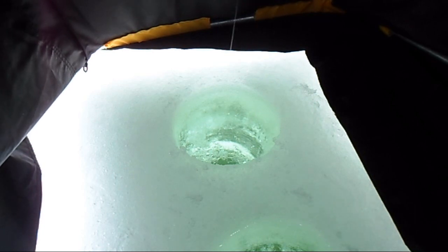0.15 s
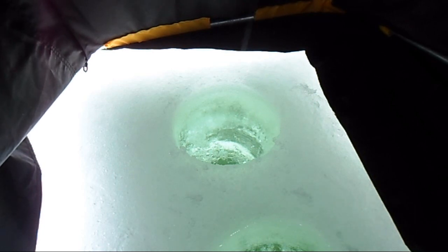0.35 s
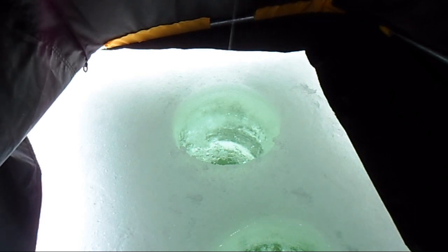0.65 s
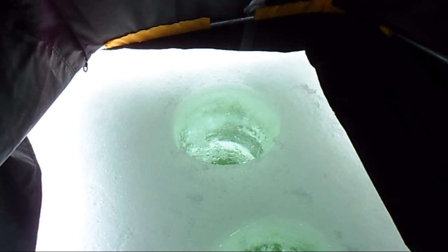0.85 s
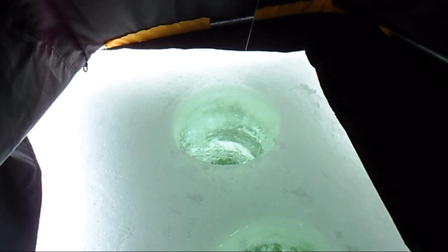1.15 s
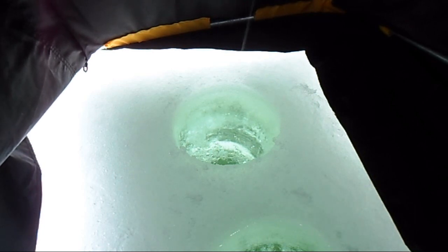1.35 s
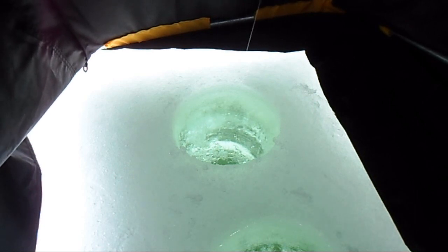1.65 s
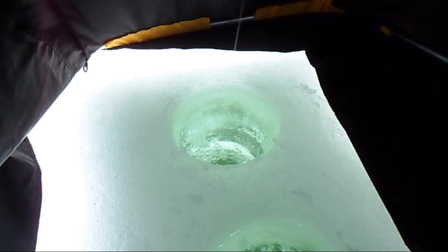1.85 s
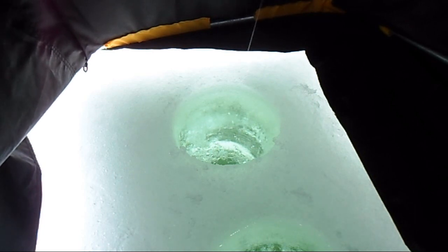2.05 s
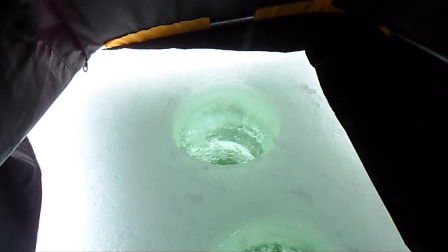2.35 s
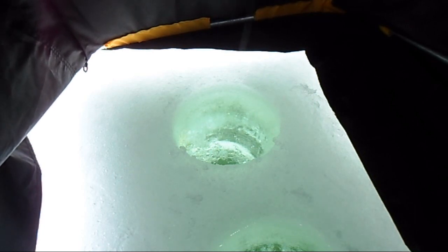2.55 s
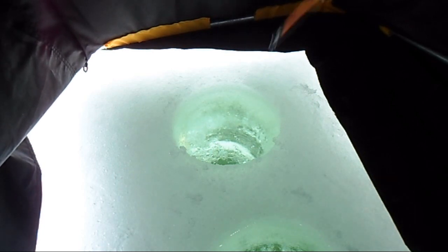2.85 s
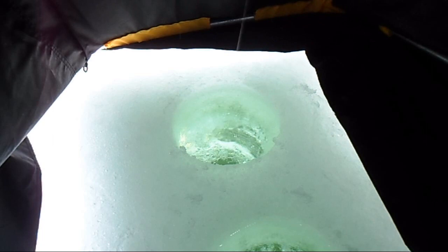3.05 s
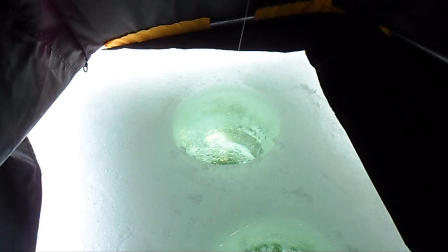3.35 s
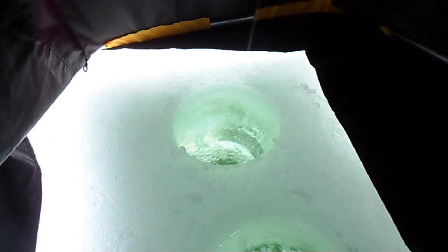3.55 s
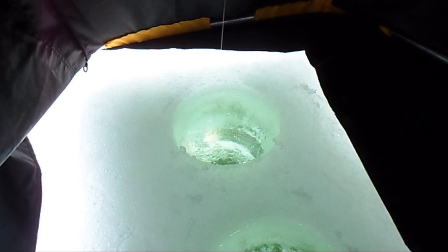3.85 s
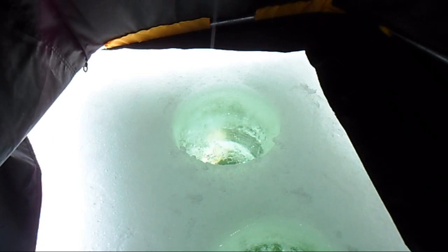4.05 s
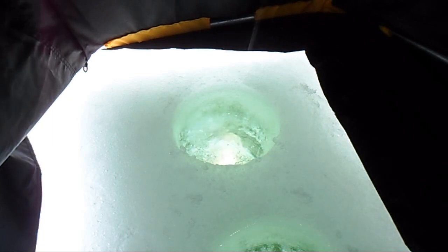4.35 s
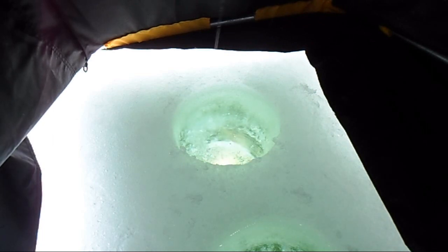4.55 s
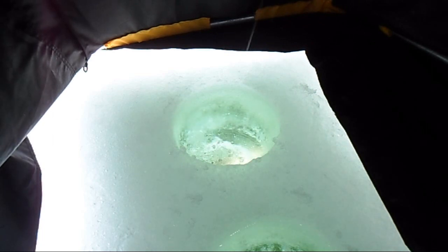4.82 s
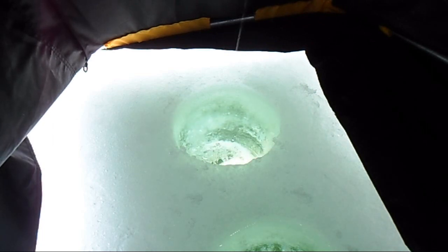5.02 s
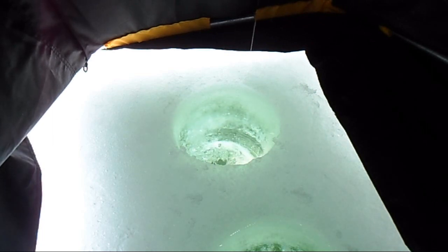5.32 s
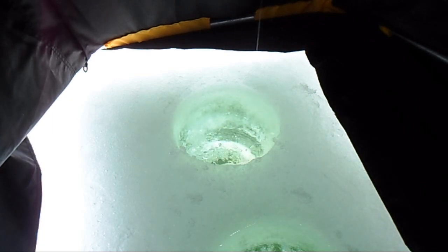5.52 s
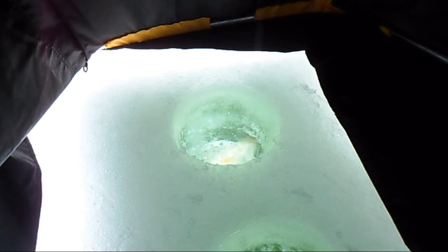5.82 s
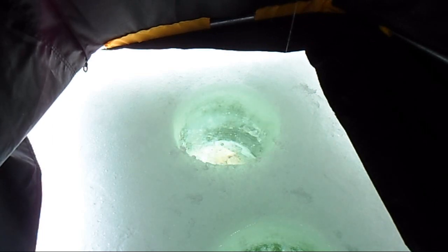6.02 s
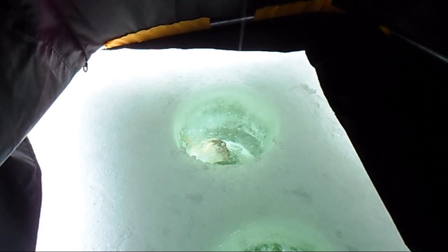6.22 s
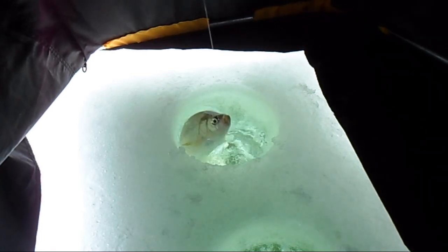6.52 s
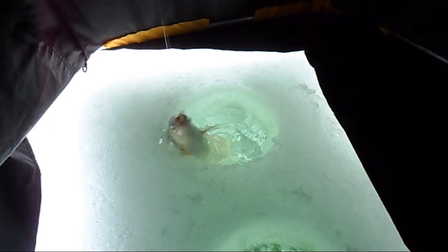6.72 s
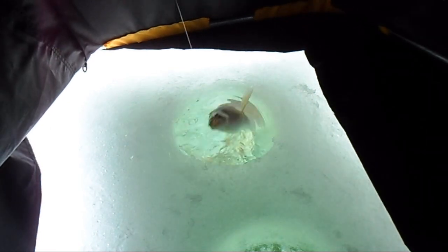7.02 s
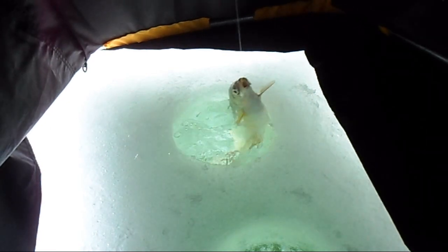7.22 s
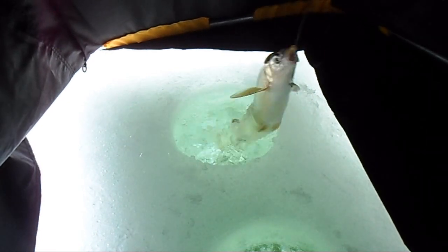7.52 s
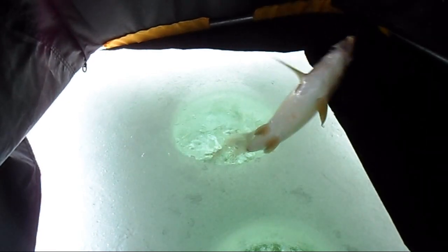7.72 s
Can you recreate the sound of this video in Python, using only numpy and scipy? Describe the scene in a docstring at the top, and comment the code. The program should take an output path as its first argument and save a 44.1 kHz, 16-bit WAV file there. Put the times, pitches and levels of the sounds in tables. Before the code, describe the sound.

In a small, dry fabric shelter, low rumble, soft fabric murmur and clothing rustle continue throughout with faint hiss. Two quick ratchet zips and a click sound within the first 0.3 s, then the microphone is knocked, creaks and is scraped until about 0.6 s, amid small watery pops. Gear whirr and ticks lead to a short rasp at 0.8 s and a longer buzz at 1.15 s. It quiets until 2.1 s, when winding resumes with several brisk rasps and rattly ticks up to 3.3 s. Around 4.1-4.3 s come another scrape, squeak and dull bump, then fainter whirring, a click at 4.45 s and a last buzz at 5.2 s. Water gulps at 6.2 s; from 6.5 to 7.2 s the fish thrashes with deep slosh, froth, spray and hard wet slaps. A massive low thump hits at 7.03 s, followed by bubbling pops, lighter slaps, a knock near 7.45 s, fading lapping and rising rustle.

```python
"""Inside a small fabric ice-fishing shelter, over low rumble, fabric murmur and clothing rustle.
The reel's drag ratchet buzzes in short runs: each tooth snaps and its pawl chatters, ringing the reel's modes.
Uneven gear meshing whirrs through the same modes in three spells; short narrow rasps and ticks are noise bursts.
The microphone housing is shoved, creaks and is scraped by shaped noise; dull blows are short low rings.
Short pitched pops, most gliding up, come now and then, more often near the end, where the fish thrashes:
slosh, gulps, froth and spray are swelling noise, and slaps are dying bursts."""
import sys
import numpy as np
from scipy import signal
from scipy.io import wavfile
from scipy.ndimage import uniform_filter1d

SR = 44100
rng = np.random.default_rng(int(sys.argv[2]) if len(sys.argv) > 2 else 0)


def to_wav(sig):
    """Store sig (one row per channel, or 1-D mono) as 16-bit WAV at the path in sys.argv[1].

    Samples outside -1..1 are clipped; the rate is SR.
    """
    pcm = np.clip(np.atleast_2d(sig), -1, 1) * 32767
    pcm = np.round(pcm).astype(np.int16)
    wavfile.write(sys.argv[1], SR, pcm.T)  # frames by channels


N = 347490   # samples in the scene
CUTOFF_HZ = 10550   # top of the microphone's range

# Resonances of the reel: f/Hz, width/Hz, relative level/dB when the pawl strikes,
# relative level/dB when the gears mesh
REEL_MODES = [(2100, 250, -2.5, 12), (2560, 270, -7, 14), (3500, 350, -5.5, -20), (3830, 110, 4, -19.5),
              (4060, 1600, -8.5, -9.5), (5790, 280, -4.5, -6), (6990, 330, -6, -29), (7740, 200, -3.5, -23),
              (8540, 400, -6.5, -10.5), (9240, 420, -7.5, -12), (9940, 430, -4, -28)]
# Runs of the slipping drag: start/s, length/s, teeth per s at the start, at the end,
# relative chatter/dB at the start, midway, at the end, frame ring against chatter/dB,
# snap against chatter/dB before its growth through the run
DRAG_RUNS = [(0.07, .088, 80, 160, -30, -27, -39.5, -7.5, 8), (0.186, .005, 70, 70, -34, -32, -32, -5, 17),
             (0.2484, .02, 64, 64, -30, -32, -33.5, -7, 9),
             (0.8055, .038, 110, 175, -26, -26.5, -43, -10.5, 7),
             (1.1457, .155, 100, 110, -27, -33, -34.5, -5.5, 15.5),
             (2.2964, .097, 75, 140, -30, -27, -34.5, -7.5, 10),
             (2.405, .047, 80, 105, -29, -27.5, -33.5, -11, 16.5),
             (2.6235, .06, 73, 71, -25.5, -32.5, -36, -5.5, 15.5),
             (2.952, .005, 70, 70, -26.5, -28, -28, -16, 11),
             (3.177, .09, 115, 72, -30, -32, -32, -6.5, 16.5),
             (4.4523, .02, 64, 64, -28.5, -37, -26, -8, 11),
             (5.1843, .07, 50, 105, -27.5, -24.5, -37, -11, 10.5)]


def from_db(db):
    """Decibels to linear gain."""
    return 10 ** (np.asarray(db) / 20)


def rms_one(x):
    """Scale a sound to rms 1."""
    return x / np.sqrt(np.mean(x ** 2) + 1e-20)


def in_time(rows):
    """Columns of a curve at every sample."""
    s, *columns = np.transpose(rows)
    return [np.interp(np.arange(N) / SR, s, column) for column in columns]


def in_spans(tables):
    """A gate open only inside the curves, and their columns; steps are rounded over 2 ms."""
    t = np.arange(N) / SR
    inside = sum((t >= rows[0][0]) & (t < rows[-1][0]) for rows in tables) > 0
    return uniform_filter1d([inside * 1., *in_time(np.vstack(tables))], size=90)


def drift(rate_hz):
    """Slow random wandering of spread 1, made at a fortieth of the sample rate."""
    r = np.exp(-80 * np.pi * rate_hz / SR)
    noise = rng.standard_normal(N // 40 + 2002)
    slow = signal.lfilter([1], [1, -2 * r, r * r], noise)[2000:]   # start-up discarded
    return np.interp(np.arange(N) / 40, np.arange(len(slow)), rms_one(slow))


def resonate(x, hz, width_hz):
    """Two-pole resonance, gain 1 on top."""
    r = np.exp(-np.pi * width_hz / SR)
    feedback = [1, -2 * r * np.cos(2 * np.pi * hz / SR), r * r]
    # the tiny offset keeps silent stretches numerically cheap
    return signal.lfilter([(1 - r * r) / 2, 0, (r * r - 1) / 2], feedback, x + 1e-18)


def grains(per_s, spread_db):
    """Random clicks of uneven size and either sign; rms 1."""
    sizes = from_db(spread_db * np.minimum(rng.exponential(1, N), 5)) * rng.choice([-1, 1], N)
    return rms_one(sizes * (rng.random(N) < per_s / SR))


def coloured(source, spectrum, patchy_db):
    """A source through half-octave bands, each with its level and its own flicker; rms 1."""
    hz, level_db = np.transpose(spectrum)
    octaves = np.log2(min(hz[-1], 1.2 * CUTOFF_HZ) / hz[0])
    edges = hz[0] * 2 ** np.arange(0, octaves + .5, .5)
    out = 0
    for k, (low, high) in enumerate(zip(edges, edges[1:])):
        band = signal.sosfilt(signal.butter(2, [low, high], "band", fs=SR, output="sos"), source)
        centre_db = np.interp(np.log(low * high) / 2, np.log(hz), level_db)
        # alternating sign makes neighbours add at their shared edge
        out = out + (-1) ** k * band * from_db(centre_db + patchy_db * drift(9.3))
    return rms_one(out)


def strikes(times, gains):
    """Single-sample clicks at the given times."""
    clicks = np.zeros(N)
    clicks[np.round(np.asarray(times) * SR).astype(int)] = gains
    return clicks


def dying(clicks, t60):
    """Each click starts an exponential decay of 60 dB in t60 seconds."""
    return signal.lfilter([1], [1, -from_db(-60 / (t60 * SR))], clicks + 1e-18)


def wavering_tone(hz, width_hz):
    """A narrow band of noise that follows a moving pitch; rms 1."""
    turning = np.exp(2j * np.pi * np.cumsum(hz) / SR)
    return rms_one((turning * (drift(width_hz) + 1j * drift(width_hz))).real)


def bursts(events, width_hz, ring_db, broad_db):
    """Sudden bursts of noise that die, strongest around their centre."""
    out, t = np.zeros(N), np.arange(SR // 8) / SR
    for s, level_db, hz, t60 in events:
        burst = rng.standard_normal(len(t)) * from_db(level_db - 60 * t / t60)
        ring = from_db(ring_db) * resonate(burst, hz, width_hz)
        broad = from_db(broad_db) * resonate(burst, 2300, 4500)
        at = round(s * SR)
        out[at:at + len(t)] += ring + broad
    return out


def swells(start, rise_s, fall_s, peak_db, rise_db, fall_db, hold_s=0):
    """Gain that climbs to each peak, holds and drops away, straight in dB; the strongest swell wins."""
    out, t = np.zeros(N), np.arange(N) / SR
    for s, rise, fall, db in zip(start, rise_s, fall_s, peak_db):
        # the drop goes on for a second fall time
        corners = s + np.cumsum([0, rise, hold_s, 2 * fall])
        span = slice(round(s * SR), round(corners[-1] * SR))
        below_peak_db = np.interp(t[span], corners, [rise_db, 0, 0, 2 * fall_db])
        out[span] = np.maximum(out[span], from_db(db - below_peak_db))
    return uniform_filter1d(out, size=90)   # corners rounded over 2 ms


def held(start, values):
    """Each value lasts until the next start."""
    latest = np.searchsorted(start, np.arange(N) / SR) - 1
    return np.asarray(values)[np.maximum(latest, 0)]


def shelter():
    """Rumble, fabric murmur and clothing rustle never stop: noise and grains through drifting bands."""
    # Background levels before trim: t/s, fabric murmur/dB, clothing rustle/dB
    background = [(0.0, -57, -63), (0.11, -56, -53), (0.2, -59.5, -53.5), (0.4, -59, -56),
                  (0.6, -58, -58.5), (1.15, -57.5, -55), (1.42, -61.5, -64), (1.78, -66.5, -72.5),
                  (2.23, -61, -69), (2.47, -57.5, -52), (2.72, -59.5, -59), (3.13, -55, -48),
                  (3.26, -61.5, -79), (3.44, -62.5, -62), (3.87, -65.5, -73), (4.2, -60, -72),
                  (4.38, -60.5, -60.5), (4.7, -58.5, -64.5), (5.3, -60, -60.5), (6.04, -62.5, -64),
                  (6.47, -54, -51.5), (7.24, -56.5, -58.5), (7.88, -51, -59.5)]
    # Spectra of low rumble, fabric murmur and clothing rustle: f/Hz, level/dB per Hz
    rumble_spectrum = [(12, -38), (20, 0.5), (123, -9.5), (348, -18.5), (387, -26), (425, -34), (500, -48),
                       (650, -70), (1100, -120)]
    murmur_spectrum = [(180, -24), (300, -2.5), (610, -7), (741, -4.5), (1200, -8), (2140, -17.5),
                       (3500, -32), (4550, -30), (7700, -120)]
    rustle_spectrum = [(1180, -32), (2000, 3), (2490, -5.5), (3010, -3), (4130, -3.5), (9570, -8.5),
                       (10500, -14), (11500, -42), (14900, -91), (22000, -120)]
    murmur_db, rustle_db = in_time(background)
    rumble_db = -53.5 + 0.35 * (murmur_db + 60)   # follows a share of the murmur's swing
    rumble = from_db(rumble_db) * coloured(rng.standard_normal(N), rumble_spectrum, patchy_db=2.0)
    fabric = coloured(grains(6000, spread_db=3.5), murmur_spectrum, patchy_db=3.0)
    murmur = from_db(murmur_db + 2.5) * fabric
    clothing = coloured(grains(9000, spread_db=-0.5), rustle_spectrum, patchy_db=4.0)
    rustle = from_db(rustle_db + 1.0 + 1.75 * drift(52)) * clothing
    return rumble + murmur + rustle


def pops():
    """Short pitched pops are decaying sines; most glide up."""
    # Pops: t/s, level/dB before the soft onset, starting f/Hz,
    # glide/octaves per half t60 (negative falls), t60/s
    pop_rows = [(.042, -39.5, 874, -1.2, 0.012), (.057, -37.5, 627, 0.4, 0.072),
                (0.258, -35.5, 560, 0.5, 0.032), (0.291, -33, 970, -0.5, 0.0091),
                (0.359, -34, 1110, 0.72, 0.016), (.385, -34.5, 483, 2.7, .06),
                (.416, -30.5, 635, .3, 0.036), (2.354, -30, 570, 0.8, 0.011),
                (4.628, -35, 550, 0.28, 0.026), (4.628, -40, 960, -0.4, 0.035),
                (5.25, -39.5, 557, 0.5, 0.026), (6.179, -36, 1090, 0.23, 0.035),
                (6.449, -35.5, 2370, .1, .04), (7.118, -26, 934, 0.4, 0.071),
                (7.154, -28.5, 737, .2, 0.051), (7.335, -38.5, 576, 0.15, 0.096),
                (7.507, -35.5, 640, 0.2, 0.062), (7.521, -37, 640, 0.092, .035),
                (7.68, -43, 675, -1, 0.069)]
    out, t = np.zeros(N), np.arange(SR // 10) / SR
    for s, level_db, hz, glide, t60 in pop_rows:
        pitch = hz * 2 ** (glide * np.minimum(2 * t / t60, 1.5))
        phase = 2 * np.pi * np.cumsum(pitch) / SR
        onset = 1 - np.exp(-t / 0.00041)
        at = round(s * SR)
        out[at:at + len(t)] += from_db(level_db - 60 * t / t60) * onset * np.sin(phase)
    return out


def teeth():
    """The spool speeds up or slows evenly through a run; teeth vary a little in timing and strength."""
    jitter_s = .001
    tooth_spread_db, frame_spread_db, snap_spread_db = 2.5, 3.0, 0.5   # tooth to tooth
    first_snap_db, snap_grows_db = -2, 5   # first tooth lets go softly; snap sharpens through a run
    rows = []
    for s, length, rate, last_rate, *run_db, frame_db, snap_db in DRAG_RUNS:
        part = np.linspace(0, 1, num=200)
        turned = length * (rate * part + (last_rate - rate) * part ** 2 / 2)   # teeth passed so far
        tooth = np.arange(int(turned[-1]) + 1)
        at = np.interp(tooth, turned, part)
        # the first tooth has no random timing or strength
        late, strong, frame, snap = rng.standard_normal((4, len(tooth))) * (tooth > 0)
        times = s + length * at + jitter_s * late
        chatter_db = np.interp(at, [0, .5, 1], run_db) + tooth_spread_db * strong
        # the snap does not share the chatter's change of strength
        snaps_db = snap_db + snap_spread_db * snap - tooth_spread_db * strong
        snaps_db = snaps_db + first_snap_db * (tooth == 0) + snap_grows_db * (at - .5)
        rows.append([times, chatter_db, frame_db + frame_spread_db * frame, snaps_db])
    return np.hstack(rows)


def small_body(x):
    """The reel is too small to radiate below its lowest mode."""
    return signal.sosfilt(signal.cheby1(7, .5, 1930, "high", fs=SR, output="sos"), x)


def ratchet():
    """A sharp snap, then the pawl chatters on its spring; the shelter adds a short tail."""
    frame_top_hz = 5000   # modes below this belong to the frame
    s, chatter_db, frame_db, snap_db = teeth()
    chatter, air = grains(16000, spread_db=0.5), rng.standard_normal(N)
    # the snap is heard directly, before anything rings
    out = resonate(strikes(s, from_db(chatter_db + snap_db + 6)), 5200, 7000)
    # every tooth strikes the modes differently
    scatter_db = rng.normal(0, 1.0, (len(s), len(REEL_MODES)))
    for k, (hz, width_hz, strike_db, mesh_db) in enumerate(REEL_MODES):
        mode_db = chatter_db + strike_db + scatter_db[:, k] + frame_db * (hz < frame_top_hz)
        clicks = strikes(s, from_db(mode_db))
        pawl = chatter * dying(clicks, t60=0.08)
        tail = from_db(-9.5) * air * dying(clicks, t60=.11)
        force = from_db(16) * clicks + pawl + tail
        out = out + from_db(7) * (-1) ** k * resonate(force, hz, width_hz)
    return small_body(out)


def rub():
    """Something rubs the microphone housing: it is shoved (lumpy bass), creaks and is scraped (dense grains)."""
    # Rubs, levels before trim: start/s, rise/s, fall/s (the drop lasts two), shove/dB,
    # creak f/Hz, creak/dB, scrape/dB
    rubs = [(0.302, .002, 0.034, -31, 1090, -27.5, -36.5), (0.346, .078, .025, -43.5, 1150, -61, -48),
            (0.44, 0.038, .07, -60, 1200, -67, -57), (3.872, 0.033, .017, -64, 780, -44, -68),
            (4.131, .113, 0.0068, -46.5, 1136, -43, -52), (4.246, 0.0095, 0.023, -32.5, 1475, -37.5, -44)]
    # Scrape spectrum: f/Hz, level/dB per Hz
    scrape_spectrum = [(240, -40), (400, -4), (2450, -3.5), (9840, -21), (10600, -29), (11500, -81),
                       (14900, -111), (22000, -120)]
    rise_db = 3   # climb during the rise
    *when, shove_db, creak_hz, creak_db, scrape_db = np.transpose(rubs)
    shove = rms_one(resonate(resonate(rng.standard_normal(N), 38, 69), 40, 340))
    creak = wavering_tone(held(when[0], creak_hz), width_hz=470)
    scrape = coloured(grains(7000, spread_db=3.0), scrape_spectrum, patchy_db=2.5)
    # fall_db is the drop in each fall time
    return (swells(*when, shove_db, rise_db, fall_db=14) * shove
            + swells(*when, creak_db - 4, rise_db, fall_db=38) * creak
            + swells(*when, scrape_db + 4, rise_db, fall_db=17) * scrape)


def thumps():
    """A push that rings a few low cycles, with a crack on top; soft contacts rise slowly."""
    # Dull blows: t/s, level/dB before the onset, f/Hz, crack against push/dB before trim, contact/ms
    blows = [(.3030, -17.5, 212, 4, 0.097), (0.3056, -18.5, 323, -27, 0.37), (0.317, -28, 90, -20, 1.3),
             (1.103, -29.5, 101, -14, 0.53), (4.1320, -34.5, 145, -7, 0.28), (4.248, -20, 127, -22, 0.15),
             (4.364, -35, 110.7, -20, 1.6), (4.545, -34, 310, -25, 1.1), (4.572, -30, 318, -25, 0.93),
             (6.2200, -26.5, 122, -10, 0.44), (6.8991, -13, 118, -19, 1.4), (7.0290, 0.5, 121, -38, 1.3),
             (7.079, -13, 112, -23, 1.6), (7.2080, -32, 59.7, -27, 2.2), (7.448, -21.5, 202, -11, 0.77)]
    out, t = np.zeros(N), np.arange(SR // 10) / SR
    for s, level_db, hz, crack_db, contact_ms in blows:
        onset = np.minimum(1000 * t / contact_ms, 1) ** 2
        ringing = from_db(-60 * t * hz / 3.25)   # down 60 dB in 3.25 cycles
        push = np.cos(2 * np.pi * hz * t - .6) * ringing * onset
        dull_noise = signal.lfilter([.4], [1, -.6], rng.standard_normal(len(t)))
        crack = dull_noise * from_db(crack_db - 18.5 - 60 * t / 0.039)
        at = round(s * SR)
        out[at:at + len(t)] += from_db(level_db) * (push + crack)
    return out


def rasps():
    """Short narrow rasps and ticks near the reel's low modes: dying bursts of resonant noise."""
    # Rasps and ticks: t/s, relative level/dB, f/Hz
    rasp_rows = [(0.3294, -51, 2030), (0.3608, -39, 2440), (0.3776, -38, 2200), (0.4214, -34, 2320),
                 (0.7818, -30, 2590), (0.8475, -34.5, 2560), (0.9062, -39.5, 2360), (1.0121, -39, 2560),
                 (1.046, -36, 2430), (1.063, -38, 2160), (2.136, -45, 2220), (2.14, -44.5, 3110),
                 (2.5173, -39, 2660), (2.7053, -39, 2380), (2.7916, -34.5, 2300), (2.811, -30, 2320),
                 (2.906, -35.5, 2050), (2.93, -36, 2100), (2.975, -32, 2090), (3.035, -37, 6200),
                 (3.0867, -29.5, 2560), (3.1, -35, 2560), (3.1346, -33.5, 2550), (4.3817, -45, 2500),
                 (4.858, -41, 2390), (5.7187, -45.5, 2420)]
    t60_s = 0.097
    return bursts([(*row, t60_s) for row in rasp_rows], width_hz=170, ring_db=13, broad_db=-13)


def gears():
    """Teeth meshing unevenly drive the reel's modes: two low ones whirr, upper ones vary against them."""
    # Three spells of crank turning: t/s, gear whirr/dB before trim, upper modes against whirr/dB
    spells = [
        [(0.74, -61, -4), (0.81, -49, 9), (0.96, -62.5, 3), (1.14, -62, 1)],
        [(2.1, -83, -4), (2.22, -71, 3), (2.29, -59.5, 10), (2.47, -68, 8), (2.524, -51.5, 2), (2.61, -67, 2),
         (2.72, -61.5, 6), (2.874, -46.5, -7), (3.094, -50.5, 1), (3.17, -58, 1)],
        [(4.28, -82, 9), (4.464, -55.5, 5.5), (4.688, -71, 1), (4.846, -56, 3.5), (5.082, -67, -5),
         (5.18, -59.5, 9), (5.3, -69, 9), (5.514, -63.5, 5), (5.612, -65, -7), (5.77, -63.5, 8.5),
         (5.91, -70, 0), (6.14, -77, -6)],
    ]
    gate, whirr_db, upper_db = in_spans(spells)
    mesh = grains(8000, spread_db=2.5) * from_db(1.5 * drift(60))
    modes = [from_db(mesh_db) * resonate(mesh, hz, width_hz / 2)
             for hz, width_hz, strike_db, mesh_db in REEL_MODES]
    lower = small_body(rms_one(sum(modes[:2])))
    upper = small_body(rms_one(sum(modes[2:])))
    return gate * from_db(whirr_db - 2.5) * (lower + from_db(upper_db) * upper)


def froth():
    """Small bubbles burst at random and ring about a dozen cycles each; rms 1."""
    # Froth spectrum: f/Hz, level/dB per Hz
    froth_spectrum = [(150, -30), (250, 4.5), (404, -4.5), (834, -7.5), (923, -3), (1410, -6), (3600, -22),
                      (4680, -46), (7920, -120)]
    hz, level_db = np.transpose(froth_spectrum)
    pitches = np.geomspace(280, 3500, 22)
    bursting = grains(4500, spread_db=3.0)
    dealt = rng.integers(0, 22, N)   # which pitch each bubble gets
    out = 0
    for k, pitch in enumerate(pitches):
        gain = from_db(np.interp(np.log(pitch), np.log(hz), level_db))
        out = out + gain * resonate(bursting * (dealt == k), pitch, pitch / 13.0)
    return rms_one(out)


def splash():
    """Slosh rocks the water column, an air pocket gulps, froth bursts and droplets spray."""
    # Surges as the fish thrashes, levels before trim: start/s, rise/s, fall/s (the drop lasts two),
    # slosh/dB, air pocket f/Hz, gulp/dB, froth/dB, spray/dB
    surges = [(6.172, 0.054, 0.05, -44, 929, -37, -39.5, -45.5),
              (6.3, 0.045, 0.092, -56, 952, -49, -65, -59),
              (6.5, 0.046, 0.077, -33.5, 1001, -59, -34.5, -32.5),
              (6.6, 0.041, 0.17, -34.5, 1000, -33, -38, -36.5),
              (6.67, 0.07, 0.27, -19.5, 710, -24.5, -39, -35),
              (6.771, 0.041, 0.15, -21.5, 760, -26, -32, -34),
              (6.84, 0.034, 0.076, -23, 941, -20.5, -27.5, -36),
              (7.0, 0.0058, 0.22, -27, 515, -23, -34, -54), (7.083, 0.011, 0.097, -28, 870, -30, -31, -40)]
    # Spray spectrum: f/Hz, level/dB per Hz
    spray_spectrum = [(1530, -9), (2600, -8), (3550, -10), (9710, -26.5), (10600, -20), (11500, -78),
                      (14900, -108), (22000, -120)]
    # Broad rumble of the water: f/Hz, width/Hz, relative level/dB
    slosh_modes = [(55, 105, 8), (225, 92, 1)]
    # The water laps on once the fish is out: start/s, slosh/dB, slosh fading/dB per s,
    # air pocket f/Hz, gulp/dB, froth/dB, spray/dB
    lapping_row = (7.5, -55, 23, 611, -60, -60, -59)
    column_hz, hold_s = 136.1, 0.017   # water column in the hole; time at each peak
    *when, slosh_db, pocket_hz, gulp_db, froth_db, spray_db = np.transpose(surges)
    lap_s, lap_slosh_db, fading_db, lap_hz, lap_gulp_db, lap_froth_db, lap_spray_db = lapping_row
    lapping = (np.arange(N) > lap_s * SR) * from_db(2 * drift(6.7))
    fading_slosh_db = lap_slosh_db - fading_db * (np.arange(N) / SR - lap_s)
    churn = rng.standard_normal(N)
    rumble = rms_one(sum(from_db(level_db) * resonate(churn, hz, width_hz)
                         for hz, width_hz, level_db in slosh_modes))
    slosh = wavering_tone(np.full(N, column_hz), width_hz=34) + from_db(-1.5) * rumble
    gulp = wavering_tone(held([*when[0], lap_s], [*pocket_hz, lap_hz]), width_hz=58)
    clumps = from_db(1.27 * drift(28))   # bursts come in bunches
    foam = rms_one(clumps * froth())
    droplets = coloured(grains(5000, spread_db=-1.0), spray_spectrum, patchy_db=4.5)
    spray = rms_one(clumps * droplets)
    # sound, peak/dB, climb to the peak/dB, drop in each fall time/dB, lapping/dB
    layers = [(slosh, slosh_db - 6.0, 11.5, 16.5, fading_slosh_db),
              (gulp, gulp_db - 6.0, 18, 35, lap_gulp_db),
              (foam, froth_db + 1.0, 11, 20.5, lap_froth_db),
              (spray, spray_db, 19, 16, lap_spray_db)]
    out = 0
    for sound, peak_db, rise_db, fall_db, lap_db in layers:
        surge = swells(*when, peak_db, rise_db, fall_db, hold_s)
        out = out + sound * (surge + from_db(lap_db) * lapping)
    return out


def slaps():
    """Tail and water strike the icy rim of the hole: dying noise bursts, longer for harder slaps."""
    # Water slapping the ice: t/s, relative level/dB, f/Hz
    slap_rows = [(6.3837, -28, 2300), (6.536, -20, 2340), (6.559, -19, 2340), (6.6794, -22, 2160),
                 (6.7739, -17, 1780), (6.8545, -18.5, 1910), (6.973, -36, 4760), (6.985, -37.5, 4660),
                 (7.096, -36, 1331), (7.1455, -26, 2750), (7.272, -39, 1240), (7.325, -34.5, 2140),
                 (7.3906, -34, 1740), (7.4557, -29.5, 1250), (7.52, -33, 2100)]
    t60_s, longer_per_db = 0.072, 0.14   # decay at -30 dB in the table; octaves of decay time per dB
    rows = [(s, db, hz, t60_s * 2 ** (longer_per_db * (db + 30))) for s, db, hz in slap_rows]
    return bursts(rows, width_hz=240, ring_db=3, broad_db=-11.5)


def scene():
    """All the sounds inside the shelter, mixed to one channel."""
    reel = ratchet() + gears()
    handling = shelter() + rub() + thumps()
    water = splash() + slaps()
    return (reel + handling + water + pops() + rasps())[None]


def record(dry):
    """The microphone adds its steady hiss, peaks are rounded, the top is cut steeply."""
    hiss = from_db(-69) * rms_one(resonate(rng.standard_normal(N), 2940, 4600))
    rounded = .4 * np.tanh((dry + hiss) / .4)
    return signal.sosfilt(signal.ellip(10, 1, 70, CUTOFF_HZ, fs=SR, output="sos"), rounded)


dry = scene()
out = record(dry)
to_wav(out)
```